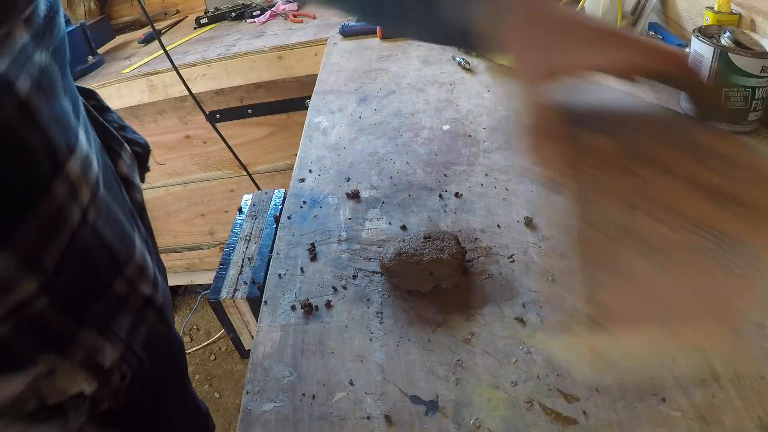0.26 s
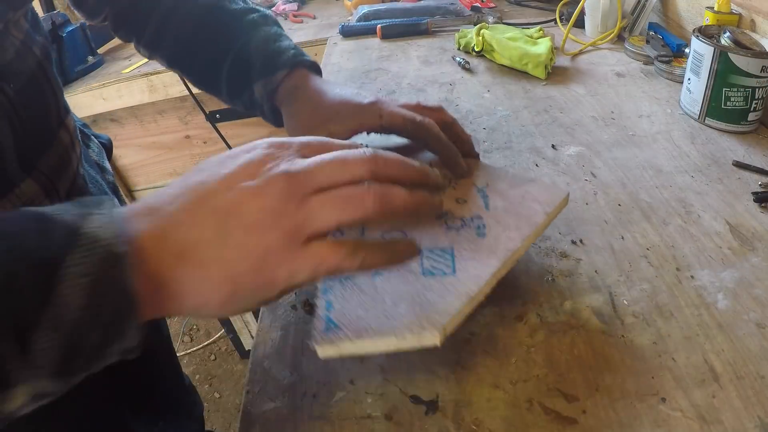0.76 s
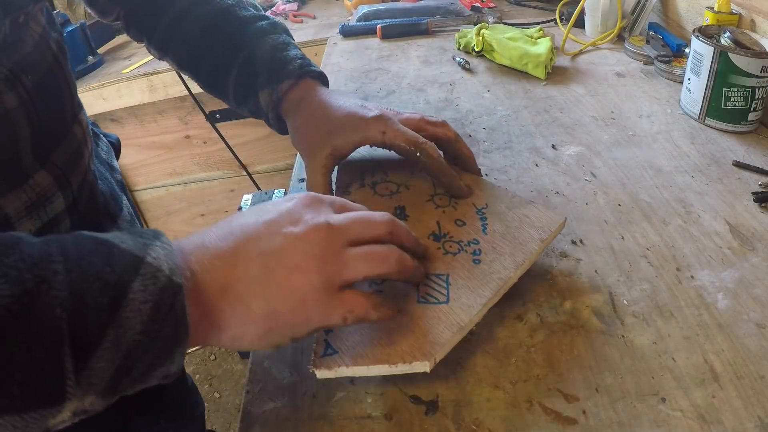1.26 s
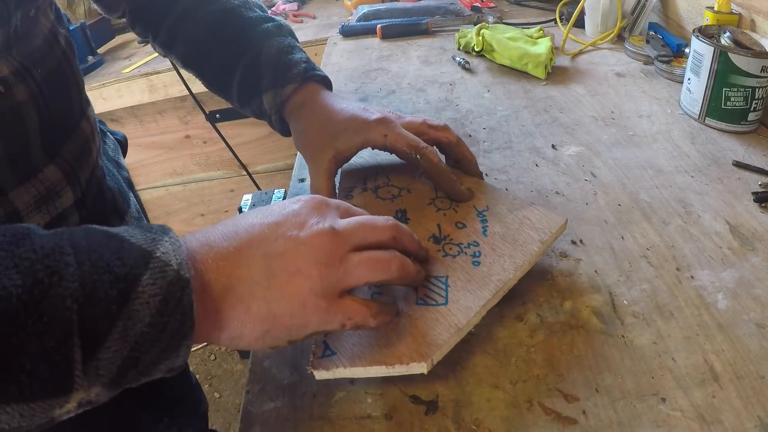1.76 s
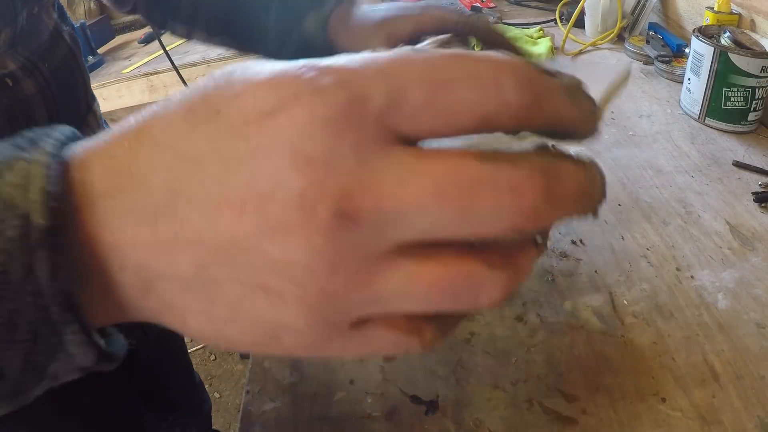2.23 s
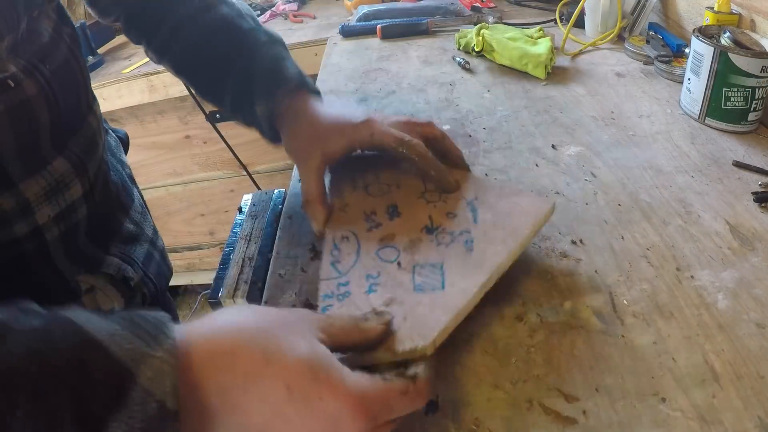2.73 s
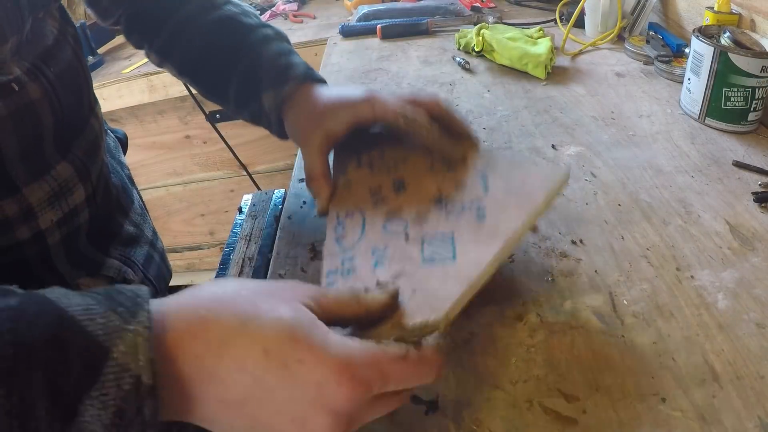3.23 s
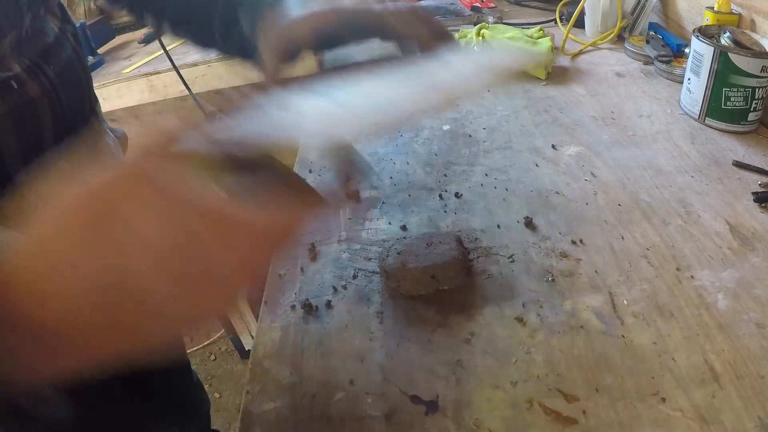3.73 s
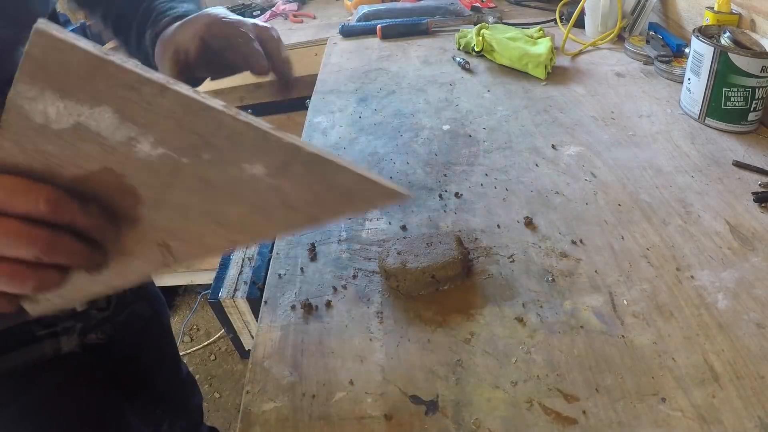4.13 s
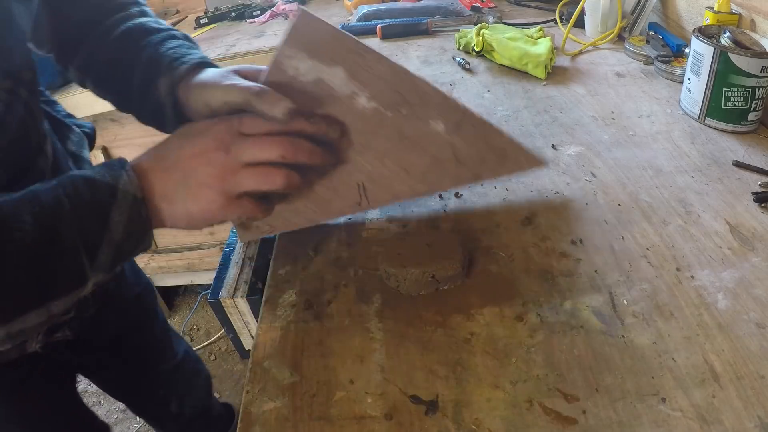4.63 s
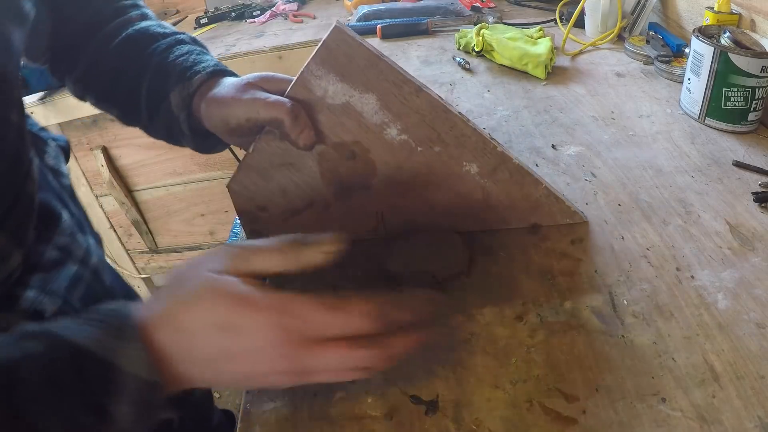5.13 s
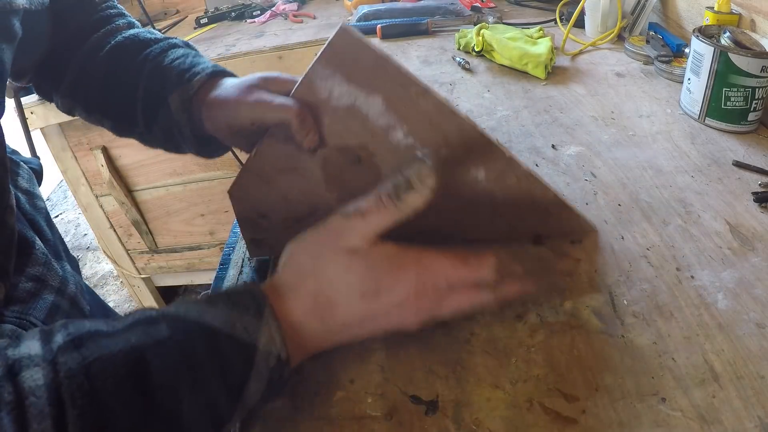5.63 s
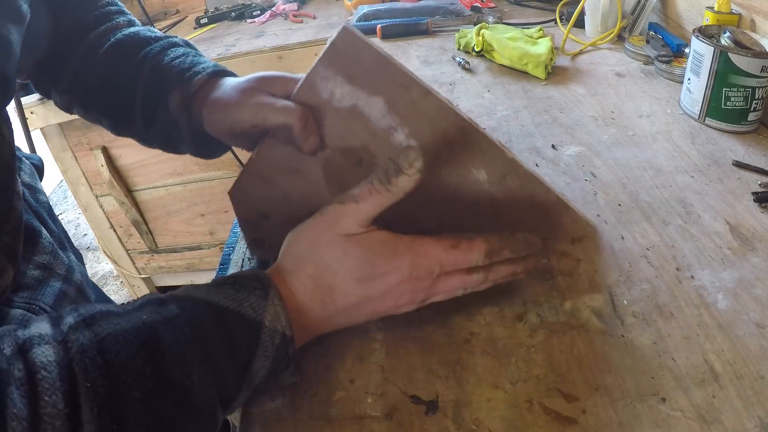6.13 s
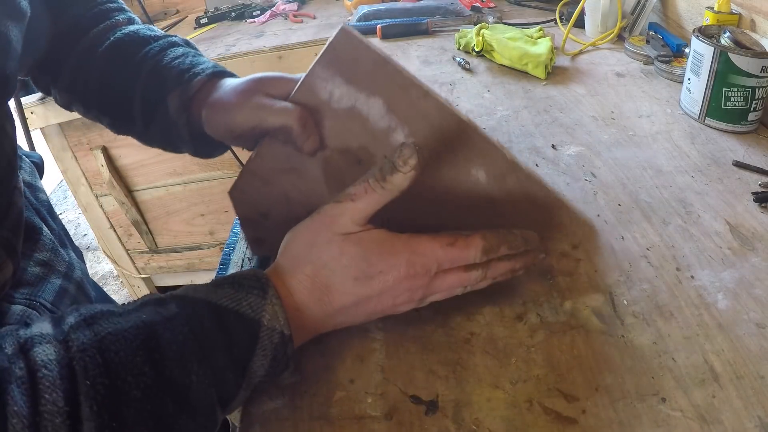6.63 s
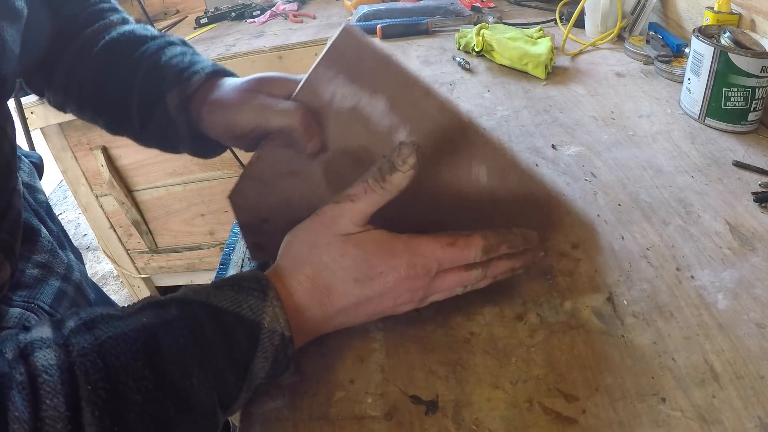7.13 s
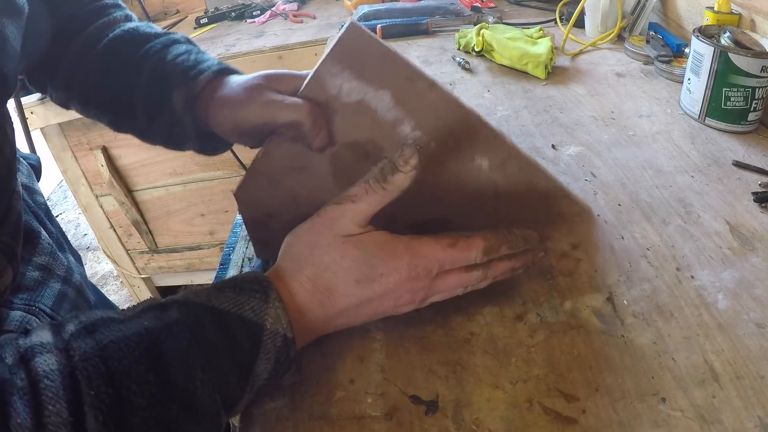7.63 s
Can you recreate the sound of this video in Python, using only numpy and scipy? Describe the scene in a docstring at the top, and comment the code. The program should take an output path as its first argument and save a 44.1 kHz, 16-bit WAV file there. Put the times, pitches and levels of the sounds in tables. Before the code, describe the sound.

Two light pats on a board and a few faint, far chirps come first, then a run of five hard slaps that make a wooden workbench boom and shake. The board is moved with soft knocks, and a muddy palm starts pressing damp soil against it, thudding quickly and scraping over the wood in between. It is all heard close, from the bench itself, in a shed with a low hum and hiss.

```python
"""A faint hum, hiss and bench rumble, then slaps: hands pat a board down on damp soil in a shed.
Each blow clacks the board, booms in the wooden workbench and sways its frame. A far bird chirps, and
something small rings after one pat. Then a palm pushes the soil against the upright board, scraping
over the wood between blows. It is all heard through the two microphone ports of a camera that stands
on the bench and turns its gain down after loud blows."""
import sys
import numpy as np
from scipy import signal
from scipy.fft import rfft, irfft, next_fast_len
from scipy.io import wavfile
from scipy.ndimage import uniform_filter1d, minimum_filter1d, map_coordinates

SR = 44100
rng = np.random.default_rng(int(sys.argv[2]) if len(sys.argv) > 2 else 0)


def master(y):
    """Save y as 16-bit WAV."""
    cut = np.clip(np.atleast_2d(y).T, -1, 1)
    pcm = np.round(cut * 32767)  # scale
    wavfile.write(sys.argv[1], SR, pcm.astype(np.int16))


N = 347508
T = np.arange(N) / SR

# Noise colours. Each row: frequency in Hz, relative level in dB.
AIR_SHARED = [(15, -7), (25, -6), (64, -13.5), (115, -15), (277, -12.5), (301, -26.5), (382, -11),
              (449, -24), (571, -23.5), (636, -26.5), (808, -28.5), (9210, -41), (14900, -51.5)]  # room tone, alike in both ports
AIR_OPPOSED = [(25, -8), (110, -3), (280, -4), (390, -7), (700, -7), (1000, -9), (2000, -19), (4000, -30),
               (5600, -25), (9000, -29), (12000, -35), (15000, -52)]  # room tone, in opposite polarity
SLAP_COLOUR = [(290, -9), (500, 1.5), (1350, -10), (1600, -14), (2220, -13), (4210, -31), (5920, -30.5),
               (10300, -53), (11100, -54), (14900, -73)]
SCRAPE_COLOUR = [(350, 3.5), (600, 2.5), (1420, -1), (2780, -6), (3310, -0.5), (3780, -4.5), (4210, -2.5),
                 (6930, -1), (8360, -17.5), (12700, -25), (14900, -69)]
# The hum. Each row: frequency in Hz, relative level in dB.
HUM_TONES = [(53.8, -43), (275, -82), (387.6, -67)]
# Weight shifting on the bench. Each row: time in seconds, frame rumble in dB, top rumble in dB.
LEANING = [(0.0, -40.5, -63.5), (0.75, -55.5, -70), (1.0, -56, -42.5), (1.299, -41, -44), (1.9, -44, -52.5),
           (2.6, -89, -70), (2.95, -19.5, -43), (3.2, -73, -31), (3.6, -25, -57), (3.9, -43, -38.5),
           (4.35, -35, -61), (4.869, -34.5, -34.5), (5.4, -42.5, -41.5), (5.9, -26, -39.5),
           (6.3, -41.5, -44), (7.2, -28, -35.5), (7.88, -25.5, -34)]
# Wood resonances. Each row: frequency in Hz, relative level in dB, time to fall 60 dB in seconds.
TOP_MODES = [(144.15, 5, 0.33), (150.7, 3.5, 0.25), (189.2, -1.5, 0.21)]  # bench top, with a close pair that beats
PLANK_MODES = [(240.4, 4.5, 0.1), (269.4, -4, 0.2), (342.4, -7, 0.15), (395.3, -10.5, 0.14),
               (448.4, -13.5, 0.1), (565, -17.5, 0.1), (733.4, -14, 0.055)]  # board and planks
FRAME_MODES = [(27.12, -1, 1.54), (46.4, -4.5, 1.7), (55.57, -6.5, 1.05), (67.9, -5, 0.53),
               (83.3, -4.5, 0.28)]
THIN_BOARD_MODES = [(1156, 10.5, 0.0093), (1575, 6.5, 0.029), (2227, -7, 0.017), (3213, -7, 0.019),
                    (3447, -5.5, 0.024), (3944, -5, 0.011), (4080, -7.5, 0.036), (4410, -32.5, 0.019),
                    (5660, -11.5, 0.044), (6650, -18.5, .015)]
# The board is shifted, lifted and set down.
# Each row: start in seconds, level in dB, slap and sway trims in dB.
BOARD_NUDGES = [(.696, -41, -31, -21), (1.592, -31, -14.5, 8), (1.916, -33, -37, 9.5),
                (2.006, -23.5, -56, -40), (2.436, -59, 4.5, -5), (2.752, -21.5, -35, -27),
                (4.044, -42.5, -1, 11), (4.215, -37, -7, -10), (4.388, -46.5, 3, 10),
                (4.705, -31, -23.5, -2), (4.8, -29.5, -33, 7.5), (5.002, -24.5, -16, 0),
                (5.247, -30.5, -7, -3), (5.274, -25.5, -3, 16.5), (5.299, -13.5, -20, -20)]
# The flat board is patted down. Each row: start in seconds, level in dB, slap, knock and sway trims
# in dB, clack emphasis in Hz, tilt in dB per octave.
BOARD_PATS = [(0.878, -13, -3.5, -4.5, -1, 1450, 2), (1.133, -12.5, -13.5, -6.5, -3, 2800, 6),
              (2.771, 0, -3.5, 2, -8, 1484, 1), (2.98, -1, -5, 2.2, -4, 900, 0.2),
              (3.163, -2, 1.5, 2.5, -4.5, 1370, -1.2), (3.365, -5, -9, 3.5, -5.5, 1360, -0.5),
              (3.558, -9.5, -0.5, 6, -14, 503, 4.5)]
# The palm pushes soil against the upright board. Each row: start in seconds, level and slap trim in dB.
SOIL_PUSHES = [(5.71, -21, -13), (5.804, -8.5, -11), (5.822, -9.5, -16.5), (5.946, -10, -30),
               (5.995, -12.5, -21.5), (6.052, -11, -16.5), (6.089, -11.5, -28), (6.168, -21.5, -37),
               (6.231, -19, -19.5), (6.333, -11, -16.5), (6.447, -15, -41), (6.496, -19, -40),
               (6.576, -6.5, -10.5), (6.723, -12, -23), (6.806, -13, -4.5), (6.929, -19, -26),
               (6.985, -9.5, -26), (7.129, -25.5, -18), (7.197, -8.5, -4), (7.238, -5, -39.5),
               (7.315, -10.5, -34), (7.384, -6, -24.5), (7.459, -11.5, -40), (7.531, -8.5, -22.5),
               (7.58, -11, -29.5), (7.653, -11, -17), (7.727, -1.5, -12.5), (7.775, -2.5, -31)]
# The shed's short tail. Each row: frequency in Hz, time to fall 60 dB in seconds.
SHED_DECAY = [(500, 0.23), (1300, 0.16), (3500, 0.14), (9000, 0.3)]
# Board and fingers scrape. Each row: start in seconds, level in dB, length in seconds, treble in dB.
FINGER_STROKES = [(0.909, -32, 0.0088, -10), (1.414, -49.5, 0.095, -9), (1.628, -42, 0.065, -12),
                  (2.021, -35.5, 0.1, -13.5), (2.422, -40.5, 0.038, -37), (2.511, -38, 0.021, -22),
                  (3.358, -46.5, 0.031, 12), (4.04, -51, 0.039, 10), (4.197, -48, 0.089, -5.5),
                  (4.37, -50.5, 0.033, 3), (4.897, -36.5, 0.16, -9), (5.269, -32.5, 0.036, -4),
                  (5.321, -35, 0.082, -28), (5.44, -45.5, 0.079, -19)]
# The muddy palm slides over the bench. Each row: start in seconds, level in dB, length in seconds.
PALM_SLIDES = [(5.685, -37, 0.052), (5.782, -29, 0.043), (5.933, -38, 0.049), (5.993, -30, 0.019),
               (6.039, -25.5, 0.051), (6.184, -40, 0.08), (6.299, -30, 0.049), (6.429, -39, 0.043),
               (6.478, -37.5, 0.029), (6.55, -27, 0.04), (6.662, -35, 0.066), (6.779, -23, 0.035),
               (6.875, -36, 0.062), (6.986, -28.5, .035), (7.071, -35, 0.064), (7.169, -29, 0.039),
               (7.258, -32.5, 0.074), (7.343, -24, 0.047), (7.448, -35.5, 0.051), (7.528, -29, 0.019),
               (7.602, -43, 0.044), (7.65, -39, 0.017), (7.685, -27, 0.074), (7.783, -30.5, 0.063),
               (7.861, -23.5, 0.021)]
# Sleeves and loose crumbs. Each row: time in seconds, level in dB.
SLEEVE_RUSTLE = [(3.6, -88), (3.85, -63), (4.46, -57), (4.87, -56.5), (5.72, -66), (6.04, -49.5),
                 (6.35, -64.5), (7.46, -44), (7.88, -46.5)]
# Chirps. Each row: start and length in seconds, first and last pitch in Hz, relative level in dB.
BIRD_NOTES = [(0.943, 0.047, 3360, 3130, -53), (1.044, .05, 2370, 2270, -62),
              (1.182, 0.066, 4150, 4440, -51.5), (1.227, 0.026, 6270, 5960, -36.5),
              (1.33, 0.056, 5570, 2520, -43.5), (1.464, 0.082, 2400, 2310, -54),
              (1.52, 0.055, 2880, 2950, -56)]
# One thin ping: start in seconds, pitch in Hz, level in dB, time to fall 60 dB in seconds.
SMALL_PING = (2.99, 5800, -38, .7)
# The stereo image. Each row: frequency in Hz, then the value named alongside.
PORT_LAG = [(30, .5), (60, .5), (110, 1.9), (190, 2.1), (300, 2.4), (700, 3.4), (1400, 3.9), (2000, 5.6),
            (2800, 6), (4500, 6.3)]  # left behind right in radians
PORT_BALANCE = [(30, -2.3), (60, -3), (125, -5), (200, -1.5), (400, -.5), (700, 2.5), (1000, -.8),
                (10000, -.5)]  # left over right in dB
PORT_LIKENESS = [(30, 0.52), (55, 0.72), (145, 0.92), (700, 0.59), (1200, 0.23), (4000, 1), (6500, 0.44),
                 (10000, 0.16)]  # correlation between the two ports, 0 to 1


def amp(db):
    return 10 ** (np.asarray(db) / 20)


def unit(x):
    return x / np.sqrt(np.mean(x ** 2) + 1e-20)


def along(points, hz):
    """Read a curve of (Hz, value) points on a log frequency axis."""
    f, v = np.transpose(points)
    return np.interp(np.log(hz + 1), np.log(f + 1), v)


def filtered(x, response):
    """EQ x with a complex frequency response."""
    m = next_fast_len(x.shape[-1] + 8192)
    return irfft(rfft(x, m) * response(np.fft.rfftfreq(m, 1 / SR)), m)[..., :x.shape[-1]]


def coloured(spectrum, size=N):
    """Two shaped noises: one common to the ports, one for what differs between them."""
    return unit(filtered(rng.standard_normal((2, size)), lambda hz: amp(along(spectrum, hz))))


def wobble(rate):
    """A smooth random drift, rate knots a second."""
    return map_coordinates(rng.standard_normal(int(N * rate / SR) + 4), [T * rate])


def patchy(x, depth_db):
    """Random gain in patches some hundreds of Hz wide and tens of milliseconds long."""
    z = signal.stft(x, nperseg=256)[2]
    field = uniform_filter1d(rng.standard_normal(z.shape[1:]), size=4, axis=0)
    field = uniform_filter1d(field, size=24, axis=1)
    return signal.istft(z * amp(depth_db * unit(field)), nperseg=256)[1][:, :N]


def ring(modes, t, attack_s, scatter_db):
    """Damped modes, struck a little differently each time; random phases in row two give width."""
    out = 0
    for hz, db, t60 in modes:
        decay = amp(db + rng.normal(0, scatter_db) - 60 * t / t60)
        out += decay * np.sin(2 * np.pi * hz * t + [[0], [rng.uniform(0, 2 * np.pi)]])
    return out * (1 - np.exp(-t / attack_s))


def ports(pair):
    """Two microphone ports in one case share part of the sound; the left lags and differs in level."""
    def blend(hz):
        turn = np.arccos(np.clip(along(PORT_LIKENESS, hz), 0, 1)) / 2
        return np.array([np.cos(turn), np.sin(turn)])

    def pan(hz):
        half_db = along(PORT_BALANCE, hz) / 2
        return np.array([amp(half_db) * np.exp(-1j * along(PORT_LAG, hz)), amp(-half_db)])

    common, own = filtered(pair, blend)
    return filtered(np.array([common + own, common - own]), pan)


def room_tone():
    """Room air and microphone hiss, with a faint, slightly unsteady hum."""
    mid = amp(-47) * coloured(AIR_SHARED)[0]
    side = amp(-49) * coloured(AIR_OPPOSED)[0]
    hum = 0
    for hz, db in HUM_TONES:
        level = amp(db + 1.5 + 0.41 * wobble(4.23))
        phase = 2 * np.pi * hz * T + 0.51 * wobble(3.9)
        hum += level * np.sin(phase - [[0], [np.pi / 2]])
    return np.array([mid + side, mid - side]) + ports(hum)


def bench_rumble():
    """Leaning and shifting shake the bench's resonances with noise."""
    def shaken(modes, width):
        def resonances(f):
            return sum(amp(db) * 1j * f * width / t60 / (hz * hz - f * f + 1j * f * width / t60)
                       for hz, db, t60 in modes)
        return unit(filtered(rng.standard_normal((2, N)), resonances))

    s, frame_db, top_db = np.transpose(LEANING)
    frame = amp(np.interp(T, s, frame_db) + 1.55 * wobble(7.4)) * shaken(FRAME_MODES, width=0.89)
    top = amp(np.interp(T, s, top_db) + 1.8 * wobble(25)) * shaken(TOP_MODES + PLANK_MODES, width=0.44)
    return frame + top


def slap(db, clack_hz, tilt_db):
    """The board clacks, most in the modes near where the hand lands; the shed's tail dies band by band."""
    def tone_db(hz):
        emphasis = 8 * np.exp(-(np.log(hz / clack_hz + .01) / .2) ** 2)
        return tilt_db * np.log2(hz / 2000 + .1) + emphasis

    t = np.arange(SR // 2) / SR
    modes = [(hz, level + tone_db(hz), t60) for hz, level, t60 in THIN_BOARD_MODES]
    clack = ring(modes, t, attack_s=.0004, scatter_db=2.5)
    hz, age, noise = signal.stft(coloured(SLAP_COLOUR, size=len(t)), SR, nperseg=128)
    direct = amp(-1.5 - 60 * age / 0.0096)
    shed = amp(-8 - 60 * age / along(SHED_DECAY, hz)[:, None])
    bands = noise * (direct + shed) * amp(0.72 * tone_db(hz))[:, None]
    smack = signal.istft(bands, SR, nperseg=128)[1][:, :len(t)]
    # wet skin lets go with a bright tick
    tick = np.gradient(smack, axis=1) * amp(-60 * t / .007) * (1 - np.exp(-t / .0003))
    return amp(db) * (amp(-13) * clack + (1 - np.exp(-t / 0.00059)) * smack + amp(13) * tick)


def blows():
    """Nudges, pats and pushes: soft flesh drives the low modes over milliseconds; the slap is sudden."""
    out = np.zeros((2, N + 2 * SR))
    t = np.arange(SR + SR // 2) / SR
    held = amp(-60 * t / 0.5)  # leaning hands damp the frame

    def strike(s, db, slap_db, knock_db, sway_db, clack_hz, tilt_db, damping=1):
        knock = amp(knock_db) * ring(PLANK_MODES, t, attack_s=0.0029, scatter_db=3.34)
        boom = amp(3.5) * ring(TOP_MODES, t, attack_s=0.018, scatter_db=0.52)
        sway = amp(sway_db) * damping * ring(FRAME_MODES, t, attack_s=0.01, scatter_db=2.6)
        start = round(s * SR)
        out[:, start:start + len(t)] += amp(db) * (boom + knock + sway)
        out[:, start:start + SR // 2] += slap(db + slap_db + 4.5, clack_hz, tilt_db)

    def knock_for(slap_db):
        return 8 + 0.4 * slap_db  # the planks follow the slap

    for pat in BOARD_PATS:
        strike(*pat)
    for s, db, slap_db in SOIL_PUSHES:
        sway_db = 2.5 + 0.39 * slap_db  # a harder push sways more
        strike(s, db, slap_db, knock_for(slap_db), sway_db, clack_hz=3670, tilt_db=1.5, damping=held)
    for s, db, slap_db, sway_db in BOARD_NUDGES:
        strike(s, db, slap_db, knock_for(slap_db), sway_db, clack_hz=1940, tilt_db=5, damping=held)
    return out[:, :N]


def scraping():
    """Grit rolls under the hand: grainy noise swells and fades with each stroke, over a soft rustle."""
    crest, slide_treble_db = .65, -3  # a stroke peaks at this share of its length
    grit = amp(np.minimum(2.8 * wobble(1500) + 1.8 * wobble(350) + 1.2 * wobble(70), 8))
    bright = unit(grit * patchy(coloured(SCRAPE_COLOUR), depth_db=3.5))
    dull = filtered(bright, lambda hz: 1 / (1 + (hz / 2500) ** 2))
    treble = bright - dull
    slides = [(*slide, slide_treble_db) for slide in PALM_SLIDES]
    out = amp(np.interp(T, *np.transpose(SLEEVE_RUSTLE), left=-90)) * bright
    for s, db, length, treble_db in FINGER_STROKES + slides:
        near = slice(max(0, round((s - 2 * length) * SR)), round((s + 3 * length) * SR))
        past_crest = (T[near] - s) / length - crest
        away = np.where(past_crest < 0, -past_crest / crest, past_crest / (1 - crest))
        swell = amp(db - 8.26 * away ** 3.2)
        out[:, near] += swell * (dull[:, near] + amp(treble_db) * treble[:, near])
    return out


def far_bird():
    """Fluttering whistles that glide quickly to their last pitch, blurred by distance."""
    song = np.zeros(N)
    for s, length, from_hz, to_hz, db in BIRD_NOTES:
        u = np.arange(round(length * SR)) / (length * SR)
        hz = to_hz + (from_hz - to_hz) * np.exp(-5 * u)
        envelope = amp(db + 2) * np.sin(np.pi * u ** 0.22)
        song[round(s * SR):][:len(u)] += envelope * np.sin(2 * np.pi * np.cumsum(hz) / SR)
    song *= amp(4.5 * wobble(180) - 3)
    blur = rng.standard_normal((2, SR // 10)) * amp(-60 * np.arange(SR // 10) / SR / 0.16)
    return signal.fftconvolve(song[None], blur / np.linalg.norm(blur[0]), axes=1)[:, :N]


def ping():
    """Something small rings thinly in a single mode after one pat."""
    s, *mode = SMALL_PING
    t = np.arange(SR + SR // 2) / SR
    out = np.zeros((2, N))
    out[0, round(s * SR):][:len(t)] = ring([mode], t, attack_s=0.0086, scatter_db=0.87)[0]
    return out


def scene():
    """The bench work and the bird reach both ports, over a bed of room tone."""
    return ports(blows() + ping() + scraping() + bench_rumble() + far_bird()) + room_tone()


def record(dry):
    """A look-ahead limiter ducks the peaks and lets the gain creep back; then a steep high cut."""
    ceiling, release_db_per_s, window_samples, high_cut_hz = .95, 9, 265, 15070
    over_db = np.maximum(20 * np.log10(np.max(np.abs(dry), 0) / ceiling + 1e-9), 0)
    regained_db = release_db_per_s * T
    duck_db = np.maximum.accumulate(over_db + regained_db) - regained_db
    gain_db = uniform_filter1d(minimum_filter1d(-duck_db, window_samples), window_samples)
    return filtered(dry * amp(gain_db), lambda hz: hz < high_cut_hz)


dry = scene()
out = record(dry)
master(out)
```